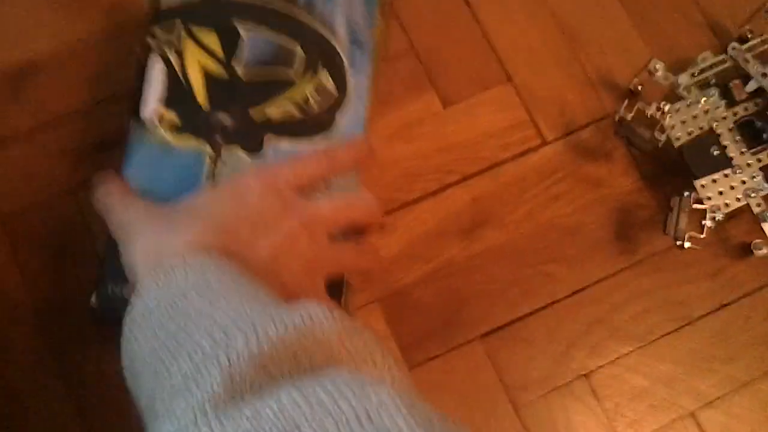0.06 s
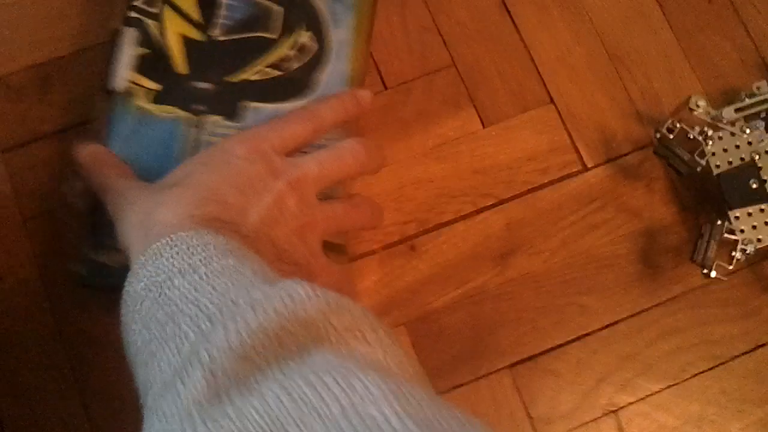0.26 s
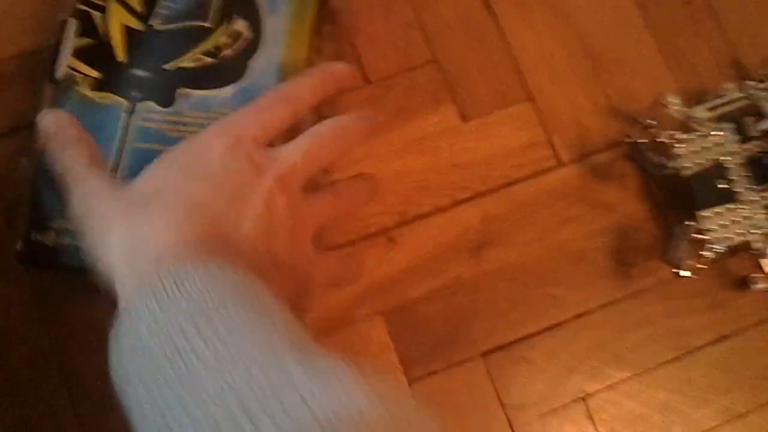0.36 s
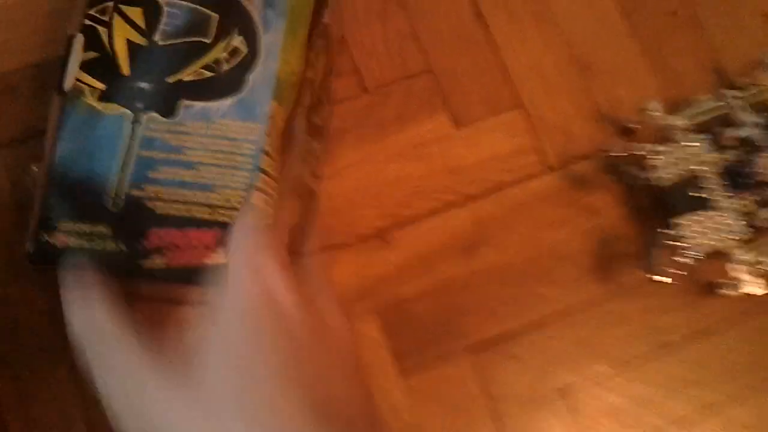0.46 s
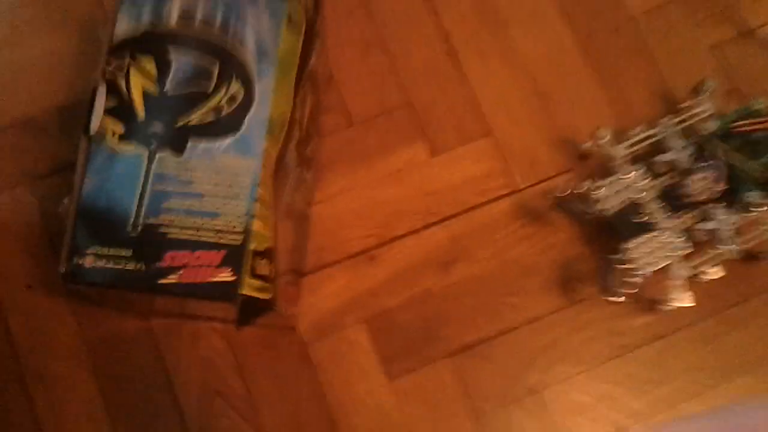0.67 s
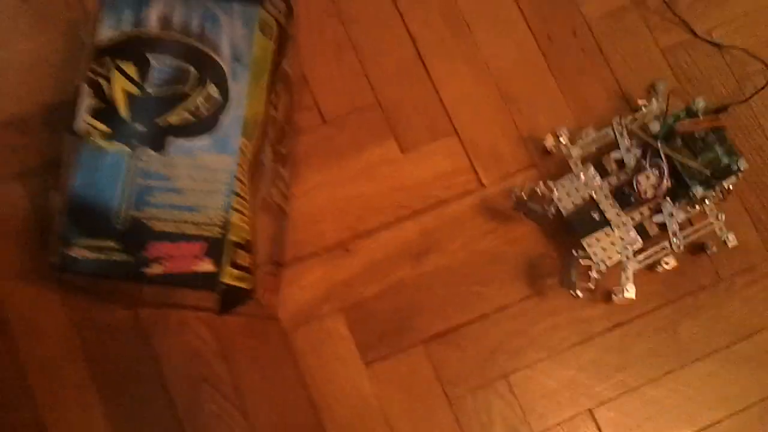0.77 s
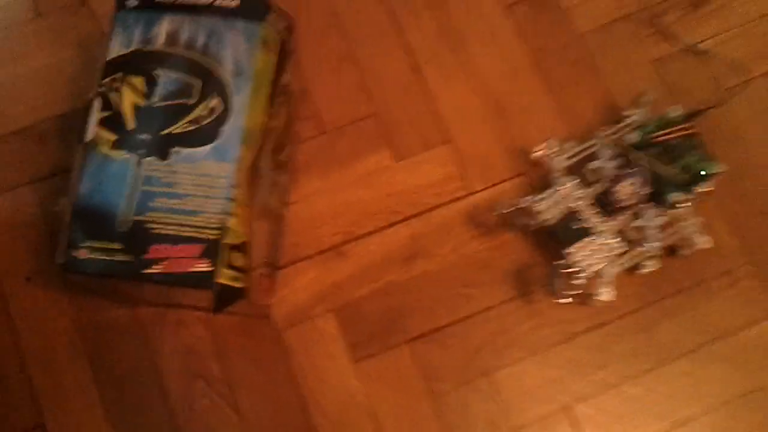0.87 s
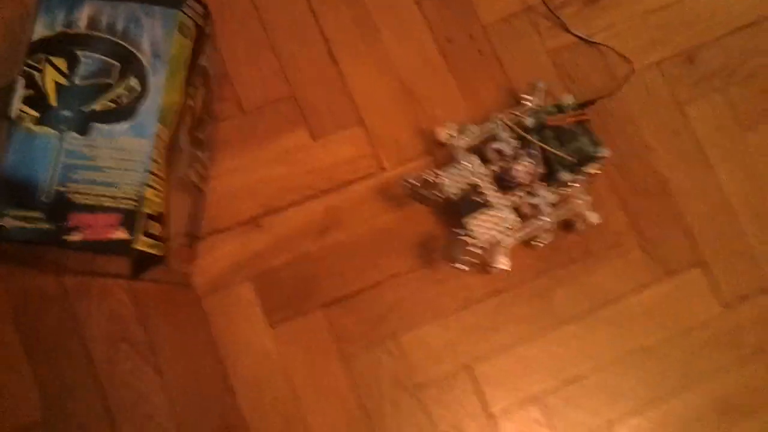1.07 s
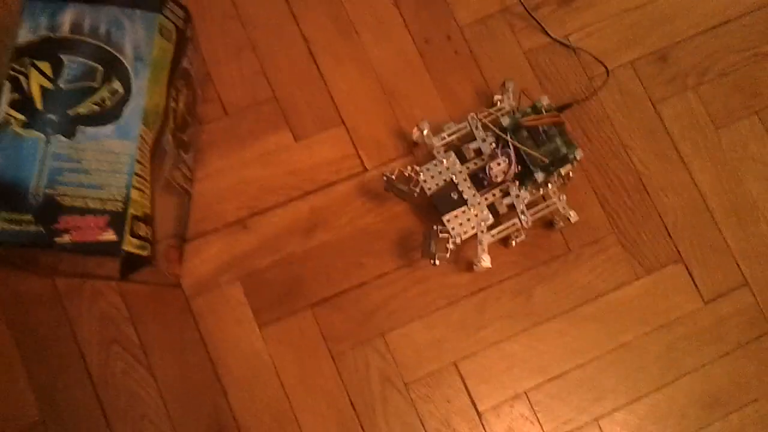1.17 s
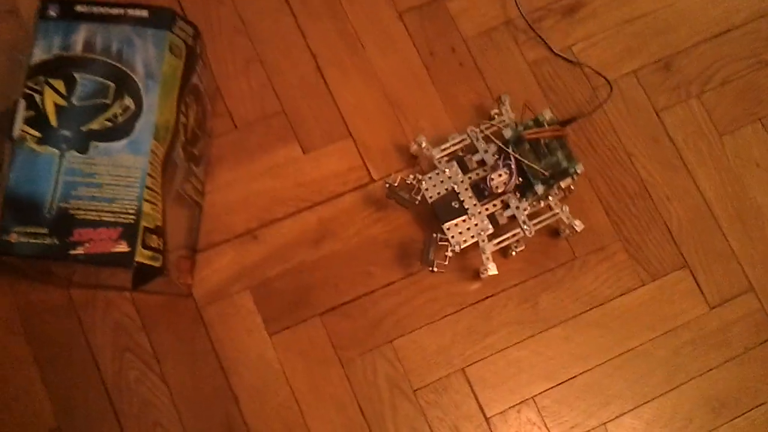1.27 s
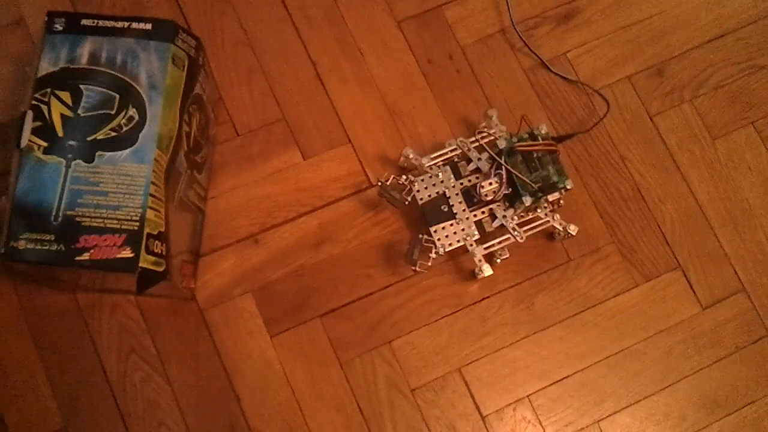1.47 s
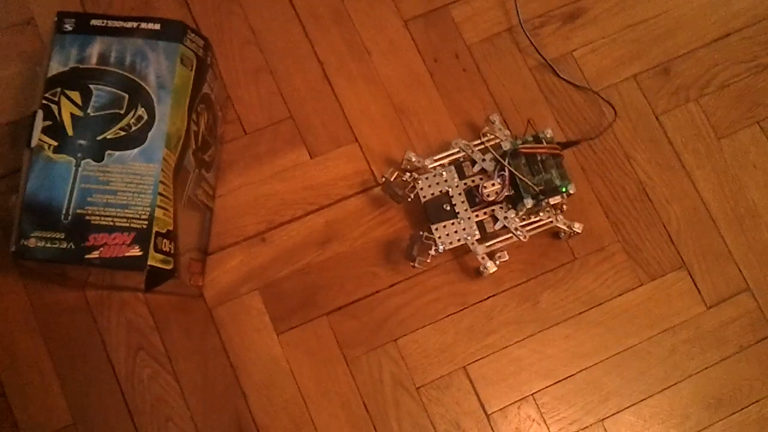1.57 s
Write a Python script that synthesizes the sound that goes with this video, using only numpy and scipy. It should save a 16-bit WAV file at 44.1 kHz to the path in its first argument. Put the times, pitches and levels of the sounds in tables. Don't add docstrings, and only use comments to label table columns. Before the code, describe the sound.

Small robot servos whirr throughout, a raspy, high gear chatter in plastic cases, dipping near 0.4 s and almost stopping around 1.13 s before resuming. A cardboard box bumps at 0.23 s, drags and rocks, then lands with a loud hollow double knock at 0.48 s on wood. A bright click comes at 1.06 s, soft handling bumps until 1.24, faint ticks at 1.28 and 1.44. Quiet room hush and hum.

```python
import sys
import numpy as np
from scipy import signal
from scipy.fft import rfft, irfft, next_fast_len
from scipy.io import wavfile
from scipy.ndimage import map_coordinates

SR = 44100
rng = np.random.default_rng(int(sys.argv[2]) if len(sys.argv) > 2 else 0)


def gain_from_db(level_db):
    decades = np.asarray(level_db, float) / 20
    return 10 ** decades


def output_pcm(signal):
    pcm = np.clip(np.atleast_2d(signal).T, -1, 1) * 32767
    wavfile.write(sys.argv[1], SR, np.round(pcm).astype(np.int16))


N = 70560


def unit(x):
    return x / np.sqrt(np.mean(x ** 2) + 1e-20)


def along(points, hz):
    point_hz, values = np.transpose(points)
    return np.interp(np.log(hz + 1), np.log(point_hz + 1), values)


def curves(rows):
    seconds, *columns = np.transpose(rows)
    return [np.interp(np.arange(N) / SR, seconds, column) for column in columns]


def wobble(rate):
    knots = rng.standard_normal(int(N / SR * 100))
    return map_coordinates(knots, [np.arange(N) * min(rate, 90) / SR])


def filtered(x, response):
    size = next_fast_len(N + SR // 2)
    return irfft(rfft(x, size) * response(np.fft.rfftfreq(size, 1 / SR)), size)[..., :N]


def shaped_noise(shape):
    return unit(filtered(rng.standard_normal(N), lambda f: gain_from_db(along(shape, f))))


def resonance(f, hz, width_hz):
    return 1j * f * width_hz / (hz * hz - f * f + 1j * f * width_hz)


def highpass(f, hz):
    s = 1j * f / hz
    return s * s / (s * s + np.sqrt(2) * s + 1)


def add(track, s, sound):
    part = track[round(s * SR):][:len(sound)]
    part += sound[:len(part)]


# frequency in Hz, t60 in seconds.
ROOM_DECAY = [(150, 0.38), (1000, .3), (6000, 0.56)]


def room(x):
    hz, t, z = signal.stft(rng.standard_normal(SR // 2), SR, nperseg=256)
    decay = gain_from_db(-60 * t / along(ROOM_DECAY, hz)[:, None])
    tail = signal.istft(z * decay, SR, nperseg=256)[1]
    return signal.fftconvolve(np.pad(x, (200, 0)), tail / np.linalg.norm(tail))[:N]


# time in seconds, servo effort in dB, load (up moves the chatter to the
SERVO_GAIT = [(0, -38.5, -2.1, 0.4), (.12, -41.5, -0.082, 0.46), (.3, -40, -1.4, 0.46),
              (.365, -41.5, -1.8, 0.7), (.39, -50.5, -0.27, 0), (.42, -52, 0.47, 0.4),
              (.445, -38.5, -0.64, 0.18), (.72, -41.5, -1.5, 0), (.83, -42.5, 0.74, 0),
              (.87, -43.5, 0.18, 0), (1.012, -44, 0.69, 0.3), (1.03, -53, 0, 0.2), (1.135, -64, 0.27, 0.5),
              (1.15, -50.5, .6, 0.4), (1.185, -39.5, -0.78, 0.78), (1.22, -40, 0.8, 0.3),
              (1.42, -41.5, 1, 0.26), (1.6, -42.5, 1, 0.3)]
# frequency in Hz, width in Hz, level in dB,
# dB per unit of load, dB per unit of strain.
CASE_MODES = [(3257, 500, -10.5, 1, -0.5), (4193, 500, 0, -2, -2.5), (4727, 400, -9, 2.5, 16),
              (5150, 400, -6, -1, 11.5), (5484, 480, -10, 6, 8.5), (5730, 354, -6, 0.5, 7.5),
              (5980, 460, -3.5, 3, 0), (6513, 1230, -1, -0.5, -4)]


def servos():
    teeth_per_s, tooth_spread_db, bearing_hiss = 3000, 3, .8
    wander_db, shudder_db, wet_db = 1.8, 1, -7.5
    effort_db, load, strain = curves(SERVO_GAIT)
    chance, side, force = rng.random((3, N))
    teeth = (chance < teeth_per_s / SR) * np.sign(side - .5) * gain_from_db(2.1 * tooth_spread_db * (force - .5))
    drive = unit(teeth) + bearing_hiss * rng.standard_normal(N)
    chatter, sign = np.zeros(N), 1
    for hz, width_hz, db, load_db, strain_db in CASE_MODES:
        ring = unit(filtered(drive, lambda f: resonance(f, hz, width_hz) ** 2))
        mode_db = db + load_db * load + strain_db * strain + wander_db * wobble(17.66)
        chatter += sign * gain_from_db(mode_db) * ring
        sign = -sign
    chatter = unit(chatter)
    whirr = unit(chatter + gain_from_db(wet_db) * room(chatter))
    return gain_from_db(effort_db + shudder_db * wobble(45.5)) * whirr


# frequency in Hz, level in dB per Hz.
HUSH_COLOUR = [(15, -69), (25, -6.5), (279, -8), (347, -0.5), (401, 1), (789, -6.5), (3000, -8), (4400, -3),
               (6600, -13), (8000, -25.5), (10400, -65), (17600, -120)]
# time in seconds, hush level in dB.
HUSH_DRIFT = [
    (0, 1),
    (.7, 0),
    (1, 0),
    (1.15, 0),
    (1.3, -1),
    (1.6, -2.5),
]
# frequency in Hz, width in Hz, level in dB rms.
APPLIANCE_LINES = [(198.3, 50, -63), (282.6, 29, -60.5), (417, 240, -83.5), (848.5, 194, -64.5)]


def background():
    hush_db = -51 + curves(HUSH_DRIFT)[0] + .6 * wobble(7.9)
    sound = gain_from_db(hush_db) * shaped_noise(HUSH_COLOUR)
    for hz, width_hz, db in APPLIANCE_LINES:
        line = filtered(rng.standard_normal(N), lambda f: resonance(f, hz, width_hz) ** 2)
        sound += gain_from_db(db) * unit(line)
    return sound


# time in seconds, drag level in dB, scrape of the edge relative to it in dB.
DRAG_PATH = [
    (0.231, -41.5, -1),
    (.28, -44.5, -6.5),
    (0.33, -40.5, -10),
    (.365, -49.5, -18),
    (.395, -44, -7.5),
    (.415, -46.5, 0),
    (0.435, -50.5, 3.5),
    (0.471, -44.5, 0),
]
# frequency in Hz, level in dB per Hz.
CARD_RUMBLE = [(47, -46), (100, -16), (257, -5), (470, -5.5), (665, -13), (900, -39), (2000, -120)]
# frequency in Hz, level in dB per Hz.
EDGE_SCRAPE = [(300, -62.5), (700, -3), (1100, -5), (1900, -12.5), (2600, -10), (4000, -28), (9000, -120)]


def drag():
    before = (DRAG_PATH[0][0] - .01, -120, 0)
    after = (DRAG_PATH[-1][0] + .035, -120, 0)
    drag_db, edge_db = curves([before, *DRAG_PATH, after])
    rub = gain_from_db(2.5 * wobble(40)) * shaped_noise(CARD_RUMBLE)
    scrape = gain_from_db(edge_db + 2 * wobble(70)) * shaped_noise(EDGE_SCRAPE)
    return gain_from_db(drag_db) * (rub + scrape)


# time in seconds, peak in dB, centre of the struck modes in Hz,
# their spread in octaves, ring left by the gripping hand from 0 to 1.
CONTACTS = [(0.2267, -17, 263, 0.5, 0.66), (0.2282, -39, 1010, .6, 0.5), (0.2441, -35, 1390, 0.17, 0.72),
            (0.2921, -29.5, 330, 0.4, .5), (0.302, -24, 332, 0.97, 0.3), (.316, -28, 476, 0.52, 0.38),
            (0.327, -38, 510, 0.74, 0.5), (.343, -44, 465, 0.48, 0.8), (0.366, -35.5, 404, 0.23, 1),
            (0.393, -36, 370, 0.28, 1), (0.419, -37, 780, 1.1, .3), (0.4415, -23, 1075, 0.35, 0.3),
            (.4758, -9.5, 750, 1.3, 0.55), (.4805, -21, 1200, 1, .7), (0.4498, -32, 1690, 1, 0.4),
            (0.485, -9, 400, 0.77, 0.85), (.494, -14.5, 521, 0.56, 0.6), (0.4983, -20, 1500, .8, 0.69),
            (.553, -31, 810, 1.2, 0.3)]
CARTON_HZ = [137, 200, 264, 316, 397, 471, 625, 772, 950, 1070, 1320, 1530, 1812, 2040]
# level in dB, t60 in seconds.
CARTON_MODES = [(-28, .1), (-8, 0.071), (-8.5, 0.24), (-16.5, 0.3), (2, 0.094), (0, 0.11), (-10.5, 0.2),
                (-9, 0.15), (-11.5, 0.29), (1.5, 0.075), (-8.5, .1), (-13.5, 0.095), (-4, 0.088), (-9, .05)]


def box():
    lands_s = .46
    crack_t60, crack_db, crack_lift = .11, -12, 1.6
    attack_s, rattle_db, rattle_grows_s = .0008, 2.5, .02
    out, t = np.zeros(N), np.arange(SR // 4) / SR
    for s, db, centre_hz, octaves, free in CONTACTS:
        def near(hz):
            return np.exp(-.5 * (np.log2((hz + 1) / centre_hz) / octaves) ** 2)

        ring = np.zeros(len(t))
        for hz, (level, t60) in zip(CARTON_HZ, CARTON_MODES):
            mode_db = level + rng.normal(0, 1) - 60 * t / (free * t60)
            ring += gain_from_db(mode_db) * near(hz) * np.sin(2 * np.pi * hz * t)
        spectrum = rfft(rng.standard_normal(len(t)))
        hiss = irfft(spectrum * near(np.fft.rfftfreq(len(t), 1 / SR) / crack_lift), len(t))
        crack = unit(hiss) * gain_from_db(-60 * t / (free * crack_t60))
        rattle = gain_from_db(rattle_db * wobble(95)[:len(t)] * np.minimum(t / rattle_grows_s, 1))
        attack = 1 - np.exp(-t / attack_s)
        blow = (ring / np.abs(ring).max() + gain_from_db(crack_db) * crack / 2) * attack
        add(out, s, np.sign(lands_s - s) * gain_from_db(db) * rattle * blow)
    out = filtered(out, lambda f: highpass(f, 127)) + slaps()
    return out + gain_from_db(-4) * room(out)


# time in seconds, peak in dB.
SLAPS = [
    (0.3021, -38),
    (0.4428, -41.5),
    (.476, -24.5),
    (0.4809, -31.5),
    (0.496, -38),
]


def slaps():
    out, t = np.zeros(N), np.arange(SR // 20) / SR
    for s, db in SLAPS:
        add(out, s, gain_from_db(db - 60 * t / .018) * rng.standard_normal(len(t)) / 2)
    return filtered(out, lambda f: highpass(f, 1500))


# time in seconds, peak in dB, frequency in Hz.
FINGERS = [
    (1.057, -46, 65),
    (1.123, -44, 104),
    (1.143, -42.5, 100),
    (1.159, -46, 54),
    (1.178, -51, 238),
    (1.235, -50.5, 61.4),
    (0.767, -63, 54.5),
]


def fingers():
    cycles = 1.8
    out = np.zeros(N)
    for s, db, hz in FINGERS:
        phase = np.arange(round(cycles * SR / hz)) * hz / SR
        swell = np.sin(np.pi * phase / cycles) ** 2
        add(out, s, gain_from_db(db) * swell * np.sin(2 * np.pi * phase))
    return out


# time in seconds, peak in dB, centre in Hz, t60 in seconds.
TICKS = [
    (1.05945, -21, 4800, .0015),
    (1.0597, -31, 900, .004),
    (1.0612, -36, 4000, .004),
    (1.279, -32, 2000, .0025),
    (1.2792, -42, 700, .004),
    (1.4435, -33, 1400, .004),
    (1.444, -42, 420, .012),
]


def ticks():
    out, t = np.zeros(N), np.arange(SR // 20) / SR
    for s, db, hz, t60 in TICKS:
        add(out, s, gain_from_db(db - 60 * t / t60) * np.sin(2 * np.pi * hz * t))
    return out + gain_from_db(-22) * room(out)


def scene():
    return (servos() + background() + drag() + box() + fingers() + ticks())[None]


def band_limit(x):
    return signal.sosfilt(signal.butter(12, 9200, fs=SR, output="sos"), x)


# frequency in Hz, gain in dB.
MIC_RESPONSE = [(200, 3.5), (6900, 0), (7500, -6), (7900, -9.5), (8050, -26.5), (8200, -9), (8500, -12.5),
                (8850, -14), (9250, -45)]


def record(dry):
    mix = filtered(dry, lambda f: gain_from_db(along(MIC_RESPONSE, f)) * highpass(f, 93))
    return band_limit(mix)


dry = scene()
out = record(dry)
output_pcm(out)
```